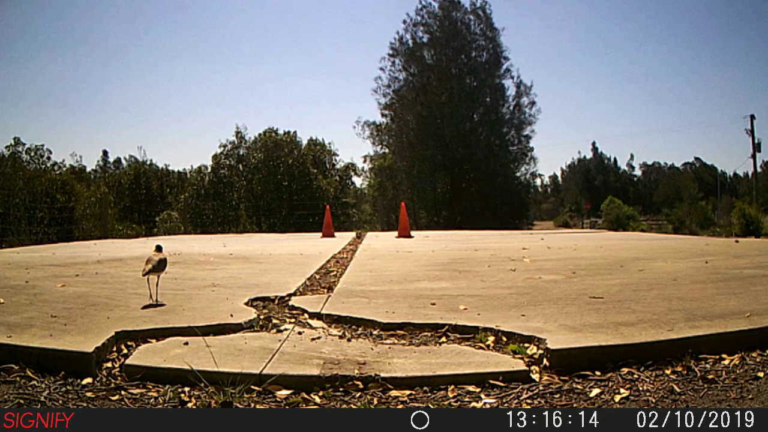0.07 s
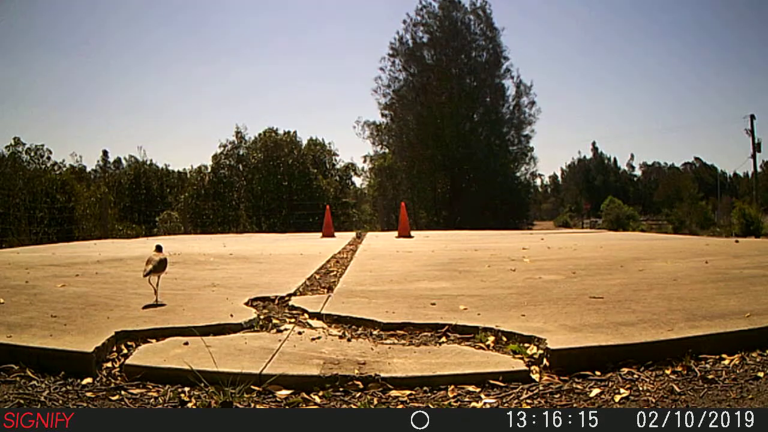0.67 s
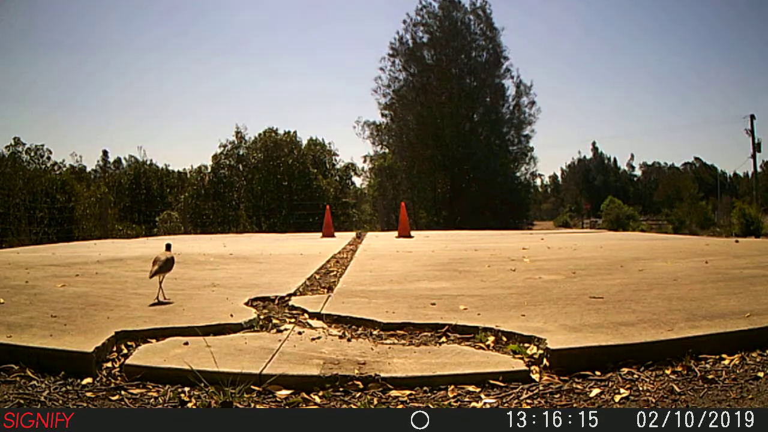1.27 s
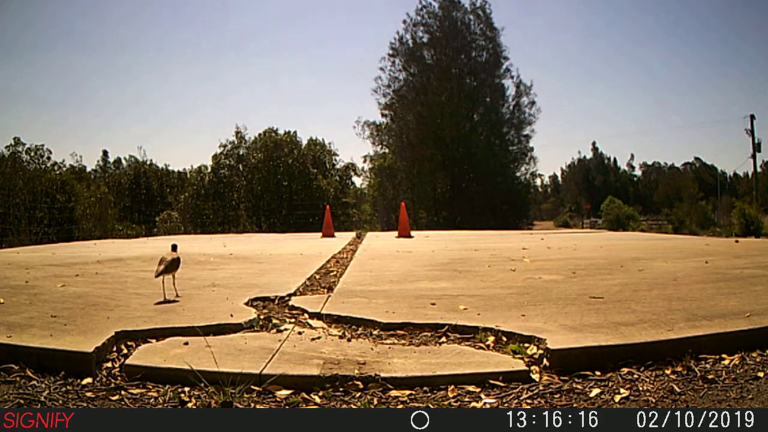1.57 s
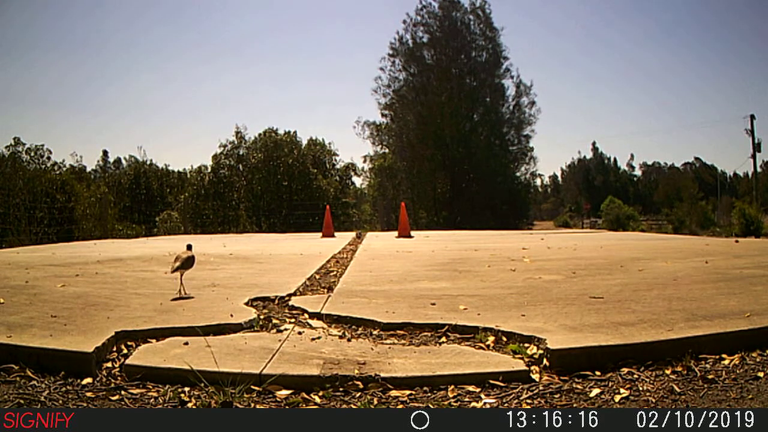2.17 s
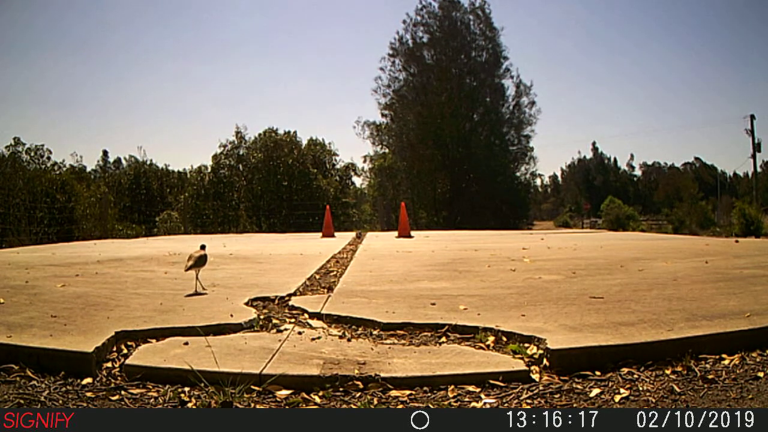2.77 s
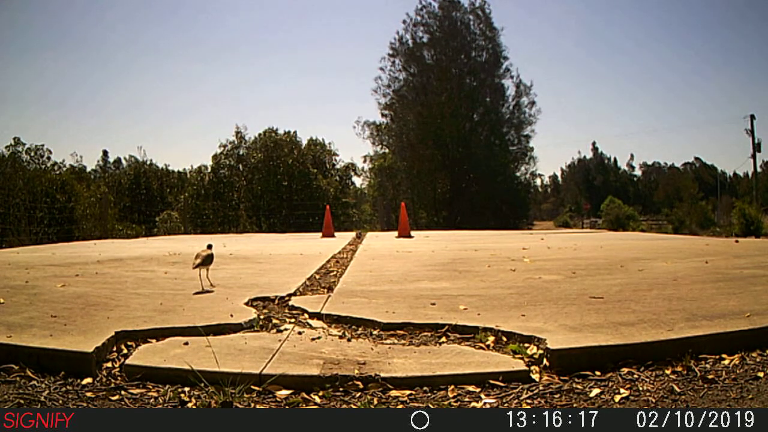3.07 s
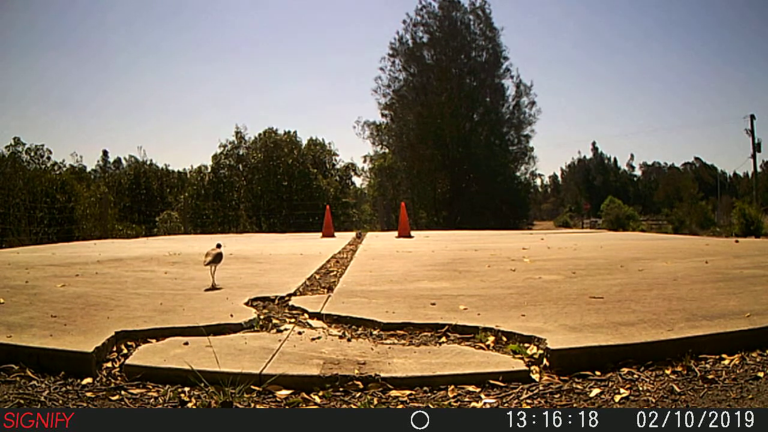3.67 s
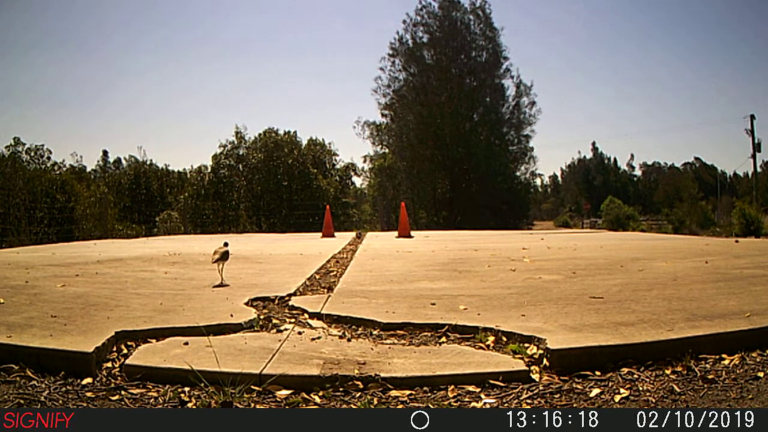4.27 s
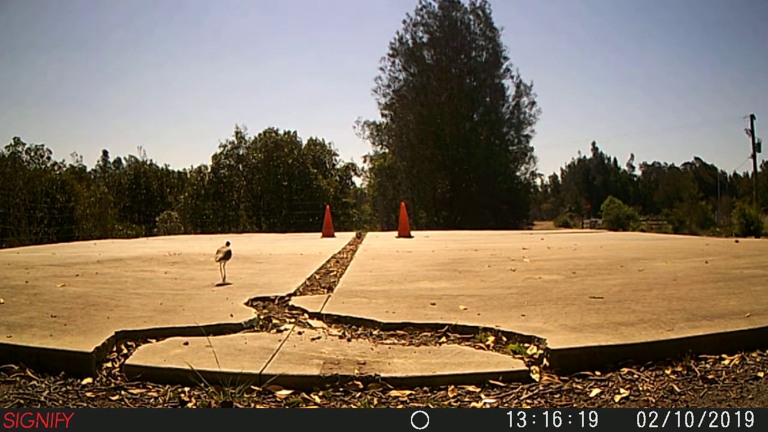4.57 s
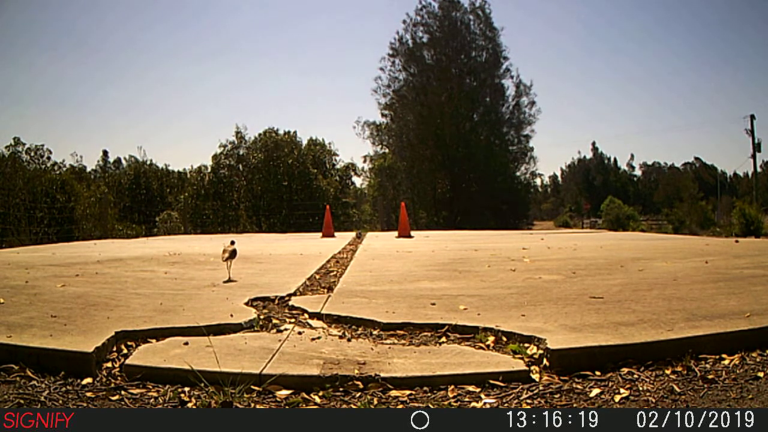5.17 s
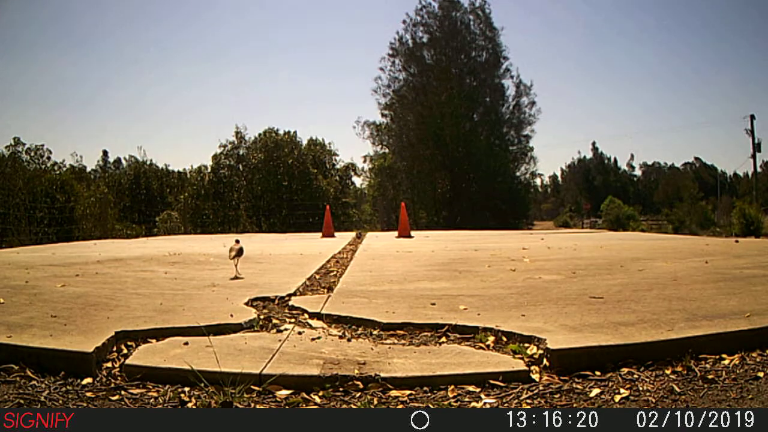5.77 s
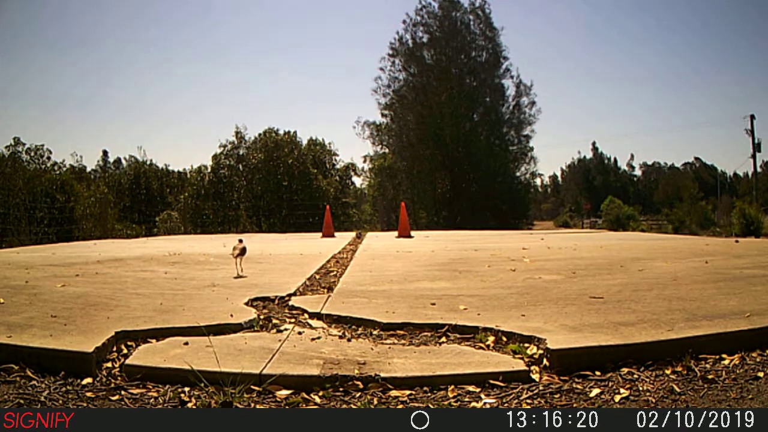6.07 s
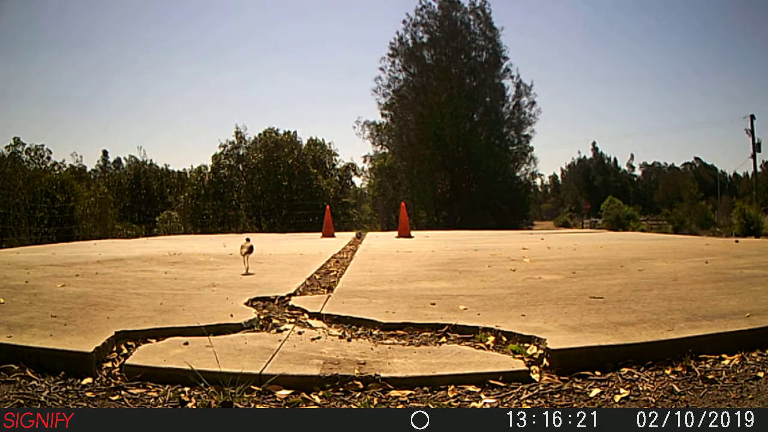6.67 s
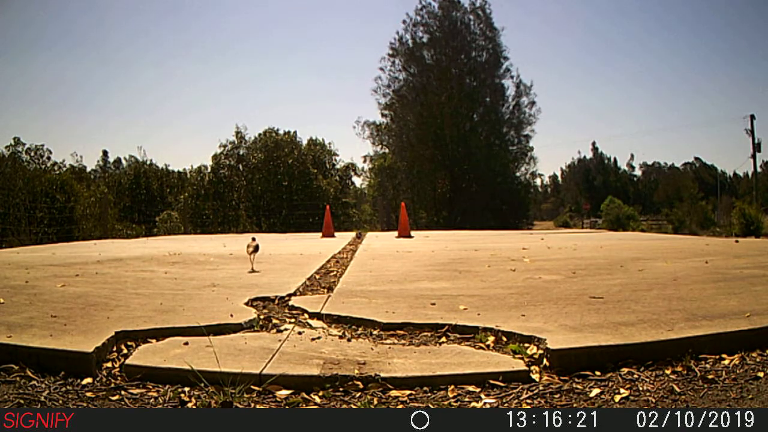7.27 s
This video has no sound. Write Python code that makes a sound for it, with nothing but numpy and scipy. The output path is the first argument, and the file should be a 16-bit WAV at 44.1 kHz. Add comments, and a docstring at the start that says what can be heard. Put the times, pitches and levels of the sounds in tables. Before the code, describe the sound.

A small outdoor microphone switches on with a pop in open country. Low wind rumbles throughout and knocks against its case in short dull thumps, strongest in the first two seconds. Behind it a distant vehicle's engine and tyres fade into steady far traffic, and trees hiss softly. Small birds give faint, brief chirps, more often towards the end. One small electrical tick comes a little past the middle.

```python
"""A pop as a trail camera wakes at the edge of a concrete pad in open country.
Wind rumbles, and its eddies buffet the case. A vehicle's engine and tyres drone away over
steady traffic, distant trees hiss, and small birds chirp faintly in short gliding notes.
The camera notches out two low bands, cuts the top and gives one electrical tick."""
import sys
import numpy as np
from scipy import signal
from scipy.fft import rfft, irfft
from scipy.io import wavfile
from scipy.ndimage import uniform_filter1d

SR = 44100
rng = np.random.default_rng(int(sys.argv[2]) if len(sys.argv) > 2 else 0)


def wav_record(signal):
    """Record a signal, one row per channel, as 16-bit PCM in the file named by sys.argv[1]."""
    frames = np.transpose(np.atleast_2d(signal))
    bounded = np.clip(frames, -1, 1)
    # unit amplitude maps onto the largest positive 16-bit level
    quanta = np.round(bounded * 32767).astype(np.int16)
    wavfile.write(sys.argv[1], SR, quanta)


N = 327222
TIME = np.arange(N) / SR


def undb(db):
    """Decibels to gain."""
    return 10 ** (np.asarray(db) / 20)


def voltage_step(at_s, db, settle_s):
    """A jump in voltage that leaks away: a pop or a tick."""
    return undb(db) * (TIME >= at_s) * np.exp(-np.maximum(TIME - at_s, 0) / settle_s)


def walk(rate_hz):
    """Random levels held for 1 / rate_hz and smoothed twice; spread near 1."""
    hold = int(SR / rate_hz)
    levels = np.repeat(rng.standard_normal(N // hold + 1), hold)
    return 1.3 * uniform_filter1d(uniform_filter1d(levels, hold), hold)[:N]


def swell(at_s, half_width_s):
    """Gaussian rise to 1 and back."""
    return np.exp(-((TIME - at_s) / half_width_s) ** 2)


def lift_db(swells):
    """Summed rise of a table of swells."""
    return sum(db * swell(at_s, half_width_s) for at_s, half_width_s, db in swells)


def turbulence(colour, flicker_db, rate_hz, bands=11):
    """Coloured noise of rms 1 whose octaves waver independently."""
    hz, db = np.transpose(colour)
    bin_hz = np.maximum(np.fft.rfftfreq(N, 1 / SR), 1)
    spectrum = rfft(rng.standard_normal(N)) * undb(np.interp(np.log2(bin_hz), np.log2(hz), db))
    spectrum /= 1 + (bin_hz / (2 * hz[-1])) ** 2  # roll-off past the last point
    octave = np.clip(np.log2(bin_hz / 10), 0, bands - 1)
    out = np.zeros(N)
    for k in range(bands):
        band = irfft(spectrum * np.maximum(1 - abs(octave - k), 0), N)
        out += band * undb(flicker_db * walk(rate_hz))
    return out / out.std()


# Wind spectrum: (frequency [Hz], relative density [dB])
WIND_SPECTRUM = [(4, 3.5), (10, 5), (25, -1), (42, -2), (56, 1), (80, -7.5), (130, -13), (200, -26.5),
                 (400, -51)]


def wind_rumble(db=-30, ease_db_per_s=0.34):
    """Low turbulence of a slowly easing breeze."""
    return turbulence(WIND_SPECTRUM, flicker_db=1.0, rate_hz=7.2) * undb(db - ease_db_per_s * TIME)


# Tyre and engine spectra: (frequency [Hz], relative density [dB])
TYRE_SPECTRUM = [(300, -20), (600, -4), (800, -0.5), (1000, -1), (1300, -7.5), (2000, -18), (3200, -27.5),
                 (6000, -46)]
ENGINE_SPECTRUM = [(100, -21.5), (200, 4.5), (260, -2), (330, -1), (400, -9), (520, -12.5), (800, -21)]
# Swells in the roar: (time [s], half width [s], lift [dB])
ROAR_SWELLS = [(2.5, .55, 3), (4.8, .5, 1.8)]


def traffic(road_db=-68, vehicle_lift_db=16.5, recede_s=2.6, engine_db=-52, engine_follow=0.39):
    """Tyre roar and engine rumble sink to the level of the far road as a vehicle recedes."""
    roar_db = road_db + vehicle_lift_db * np.exp(-TIME / recede_s) + lift_db(ROAR_SWELLS)
    # Low notes bend round the trees, so the engine fades less than the tyres.
    rumble_db = engine_db + engine_follow * (roar_db - roar_db.mean())
    tyres = turbulence(TYRE_SPECTRUM, flicker_db=0.54, rate_hz=6.3) * undb(roar_db)
    engine = turbulence(ENGINE_SPECTRUM, flicker_db=1.6, rate_hz=8) * undb(rumble_db)
    return tyres + engine


# Air carrying the engine note closer: (time [s], half width [s], lift [dB])
DRONE_SWELLS = [(.85, .42, 6), (2.95, 0.67, 7.5)]


def engine_drone(hz=338.5, db=-57, fade_db_per_s=2.5):
    """The engine's clearest note wavers in moving air and fades as the vehicle leaves."""
    note = np.sin(2 * np.pi * np.cumsum(hz + .9 * walk(9)) / SR)
    return note * undb(db - fade_db_per_s * TIME + lift_db(DRONE_SWELLS) + 1.5 * walk(7))


# Tree hiss spectrum: (frequency [Hz], relative density [dB])
TREE_SPECTRUM = [(100, -3), (400, 7), (1000, -1.5), (2000, -10.5), (3500, -11.5), (5000, -11),
                 (7500, -17.5), (10000, -48)]


def tree_hiss(db=-60, whine_hz=749, whine_db=-71):
    """Smooth hiss of distant trees, with a faint wavering whine."""
    hiss = turbulence(TREE_SPECTRUM, flicker_db=.2, rate_hz=5)
    whine = np.sin(2 * np.pi * np.cumsum(whine_hz + 3 * walk(12)) / SR)
    return hiss * undb(db) + whine * undb(whine_db + 2 * walk(5))


def chirp(flutter_hz, at_s, length_s, start_hz, end_hz, db, bend=1):
    """One gliding, fluttering note; bend under 1 glides early, over 1 late."""
    out = np.zeros(N)
    span = np.flatnonzero((TIME >= at_s) & (TIME < at_s + length_s))
    progress = np.linspace(0, 1, len(span))
    hz = start_hz + (end_hz - start_hz) * progress ** bend + flutter_hz[span]
    envelope = 2 * np.sqrt(progress * (1 - progress))
    out[span] = undb(db) * envelope * np.sin(2 * np.pi * np.cumsum(hz) / SR)
    return out


# Soft sagging chips: (time [s], relative level [dB], start pitch [Hz])
CHIPS = [(.115, -62.5, 4750), (.448, -64.5, 4450), (2.19, -67, 4200), (2.55, -64.5, 3300),
         (2.822, -65.5, 3550), (3.048, -66.5, 3500), (6.088, -65, 2700), (7.143, -67, 3100),
         (7.184, -63, 4200), (7.257, -67, 3500)]
# Rising whistles: (time [s], relative level [dB], length [s])
WHISTLES = [(2.531, -63, .027), (4.515, -70, .016), (4.663, -67, .018), (5.487, -58, .029),
            (6.346, -63.5, .028), (6.852, -69, .016), (7.061, -66, .016), (7.104, -61.5, 0.028),
            (7.305, -63, .028)]
# High raspy calls: (time [s], length [s], start pitch [Hz], end pitch [Hz], relative level [dB])
RASPS = [(2.907, .025, 5700, 4800, -70), (3.07, .037, 7400, 4100, -64), (5.374, .028, 6870, 5300, -67.5),
         (5.492, .02, 7060, 6400, -68), (5.794, .045, 5870, 6500, -66), (5.832, .06, 4940, 4650, -63),
         (6.084, 0.029, 6560, 4200, -61), (6.219, .03, 6250, 3700, -57.5)]


def birds(gain_db=-1, chip_s=.027, whistle_hz=3440, rise_hz_per_s=49000,
          twitter_per_s=3, twitter_hz=3450, echo_db=-11, echo_t60_s=.3):
    """Chips, whistles, rasps and far twitter, scattered a little by the trees."""
    out, flutter = np.zeros(N), walk(1500)
    whistle_flutter_hz, chip_flutter_hz, rasp_flutter_hz = 65 * flutter, 162.5 * flutter, 390 * flutter
    for at_s, db, hz in CHIPS:
        out += chirp(chip_flutter_hz, at_s, chip_s, hz, .86 * hz, db)
    for at_s, db, length_s in WHISTLES:
        reach_hz = rise_hz_per_s * length_s / 2
        start_hz, end_hz = whistle_hz - reach_hz, whistle_hz + reach_hz
        out += chirp(whistle_flutter_hz, at_s, length_s, start_hz, end_hz, db, bend=.68)
    for at_s, length_s, start_hz, end_hz, db in RASPS:
        out += chirp(rasp_flutter_hz, at_s, length_s, start_hz, end_hz, db, bend=1.3)
    tail = rng.standard_normal(SR // 2) * undb(-60 * TIME[:SR // 2] / echo_t60_s)
    for when, *ends in rng.random((int(twitter_per_s * TIME[-1]), 3)):
        start_hz, end_hz = twitter_hz * 2 ** ((np.array(ends) - .5) / 2)
        out += chirp(chip_flutter_hz, when * TIME[-1], chip_s, start_hz, end_hz, db=-69.5)
    echo = signal.fftconvolve(out, tail / np.linalg.norm(tail))[:N]
    return undb(gain_db) * (out + undb(echo_db) * echo)


def eddy(at_s, db, hz, phase_turns, half_width_cycles=0.63):
    """One eddy shoves the case for a cycle or two."""
    envelope = undb(db) * swell(at_s, half_width_cycles / hz)
    return envelope * np.cos(2 * np.pi * ((TIME - at_s) * hz + phase_turns))


# Gusts on the case: (time [s], level [dB], frequency [Hz], wake length [s])
GUSTS = [(.248, -7.5, 86, .11), (.269, -8.5, 131, .01), (.797, -18.5, 60, .01), (1.595, -17, 65, .01),
         (1.614, -10.5, 110, 0.27), (2.151, -19.5, 68, .01), (3.019, -21.5, 54.3, 0.16),
         (3.78, -14, 52, 0.095), (3.876, -19, 63.7, .02), (5.628, -18, 55, .02)]


def gusts(knock_db=-17, knock_ratio=1.82, eddies_per_s=42, wake_db=-6, fade_db=8.5,
          wake_ratio=0.724, sag_octaves=0.62, scatter_octaves=0.62):
    """Each gust thumps the case, sheds a small fast eddy and trails weaker, ever slower ones."""
    out = np.zeros(N)
    for at_s, db, hz, wake_s in GUSTS:
        draws = rng.random((16, 3))
        phase = draws[-1, 0]
        out += eddy(at_s, db, hz, phase)
        out += eddy(at_s, db + knock_db, hz * knock_ratio, phase)
        for k, (delay, scatter, phase) in enumerate(draws):
            age_s = (k + .5 + delay) / eddies_per_s
            spent = age_s / wake_s
            if spent < 1:
                octaves = scatter_octaves * (2 * scatter - 1) - sag_octaves * spent
                eddy_hz = hz * wake_ratio * 2 ** octaves
                out += eddy(at_s + age_s, db + wake_db - fade_db * spent, eddy_hz, phase)
    return out


def tyre_song(at_s=2.55, half_width_s=.22, hz=1120, width_hz=260, db=-63):
    """The tyres sing for a moment in a narrow band."""
    band = signal.butter(2, [hz - width_hz / 2, hz + width_hz / 2], "band", fs=SR, output="sos")
    song = signal.sosfilt(band, rng.standard_normal(N))
    return song / song.std() * undb(db) * swell(at_s, half_width_s)


def scene():
    """Everything that reaches the camera, in mono."""
    road = traffic() + engine_drone() + tyre_song()
    return (road + tree_hiss() + wind_rumble() + gusts() + birds())[None]


# Camera's deep notches and treble tone: (frequency [Hz], Q, centre gain [dB])
CAMERA_NOTCHES = [(159, 1.05, -36), (635, 1.05, -38)]
CAMERA_TREBLE = [(5070, 0.97, -12), (7580, 4.6, 0.5)]


def record(dry, on_s=.0726, tick_s=5.4233, mic_top_hz=8200, top_hz=16000, fade_s=.004):
    """The microphone switches on with a pop; the camera filters it and adds one electrical tick."""
    sound = signal.sosfilt(signal.butter(12, mic_top_hz, fs=SR, output="sos"), dry)
    pop = voltage_step(on_s, db=-9.5, settle_s=0.17)
    pop = signal.sosfilt(signal.butter(4, mic_top_hz, fs=SR, output="sos"), pop)
    out = sound * (TIME >= on_s) + pop
    for hz, q, db in CAMERA_NOTCHES + CAMERA_TREBLE:
        out += (undb(db) - 1) * signal.lfilter(*signal.iirpeak(hz, q, fs=SR), out)
    out += voltage_step(tick_s, db=-34.5, settle_s=0.013)
    out *= np.clip((TIME[-1] - TIME) / fade_s, 0, 1)
    return signal.sosfilt(signal.ellip(8, .2, 70, top_hz, fs=SR, output="sos"), out)


dry = scene()
out = record(dry)
wav_record(out)
```